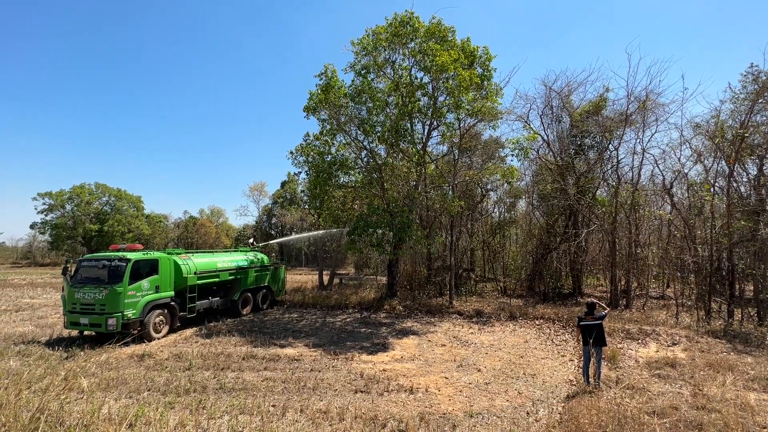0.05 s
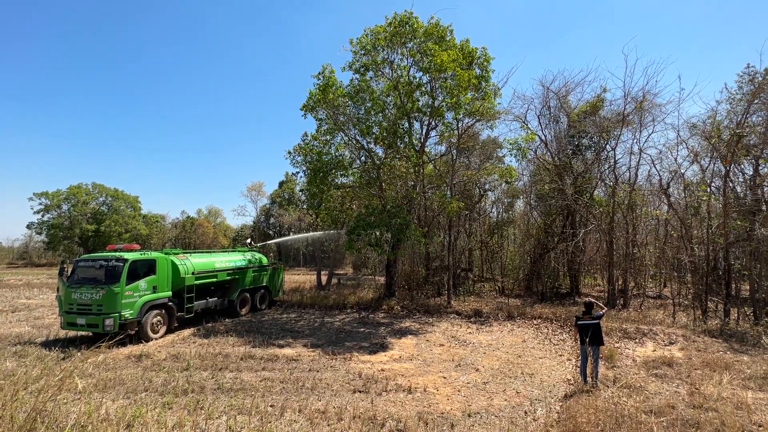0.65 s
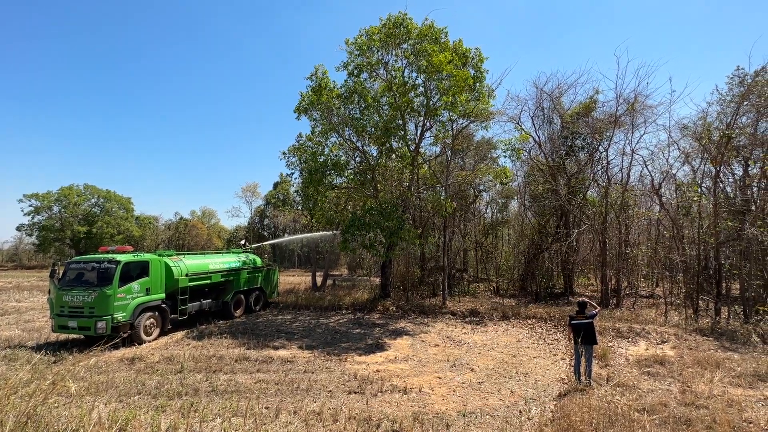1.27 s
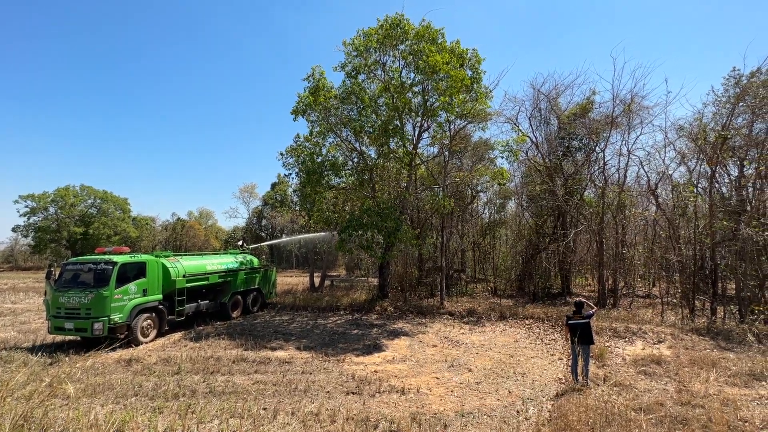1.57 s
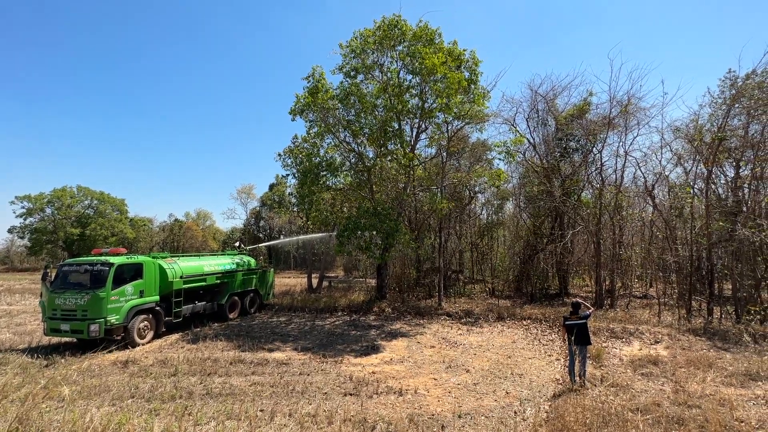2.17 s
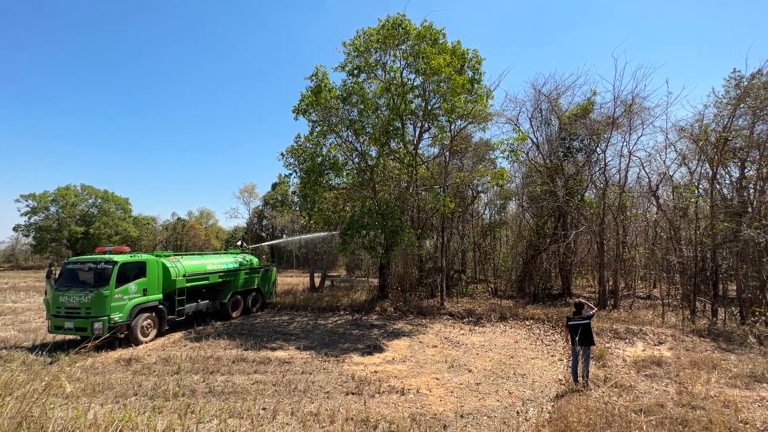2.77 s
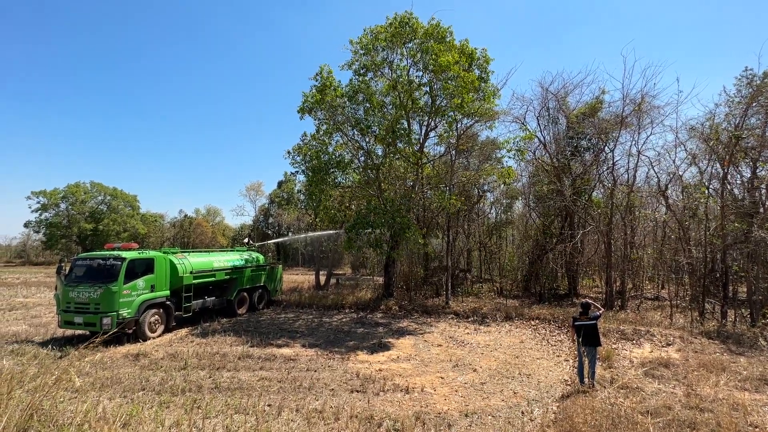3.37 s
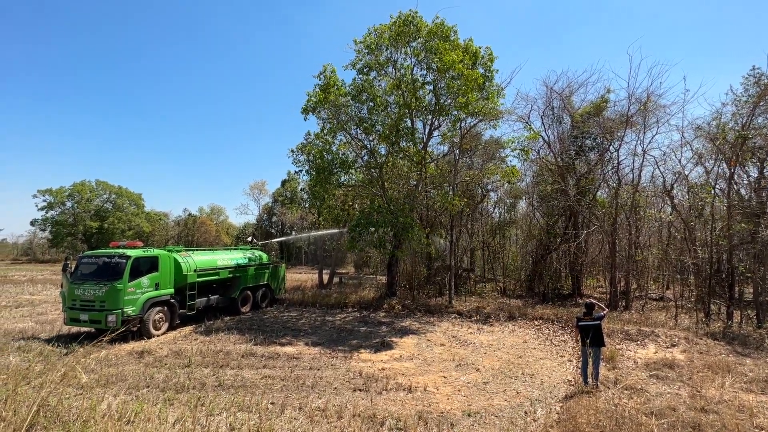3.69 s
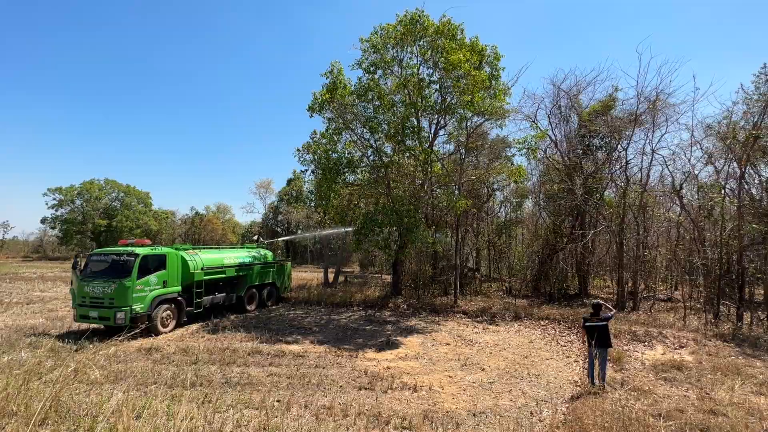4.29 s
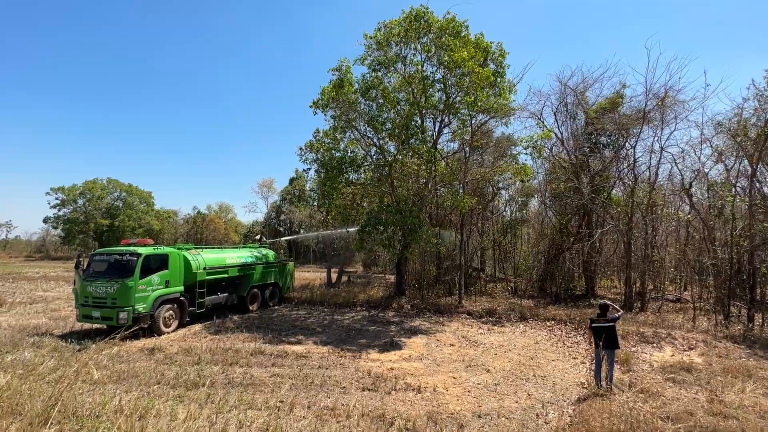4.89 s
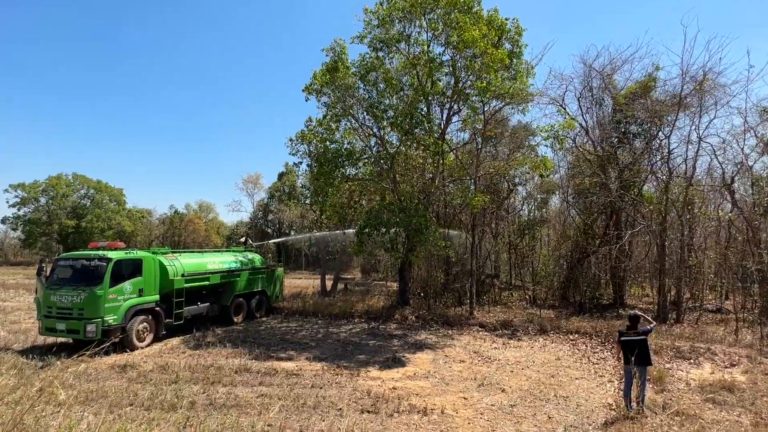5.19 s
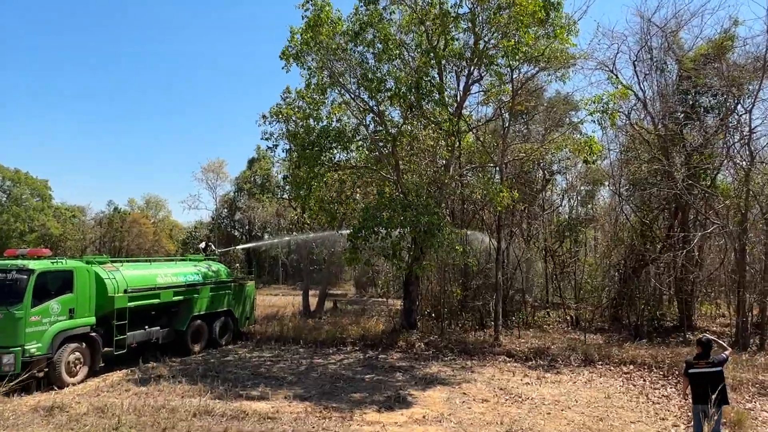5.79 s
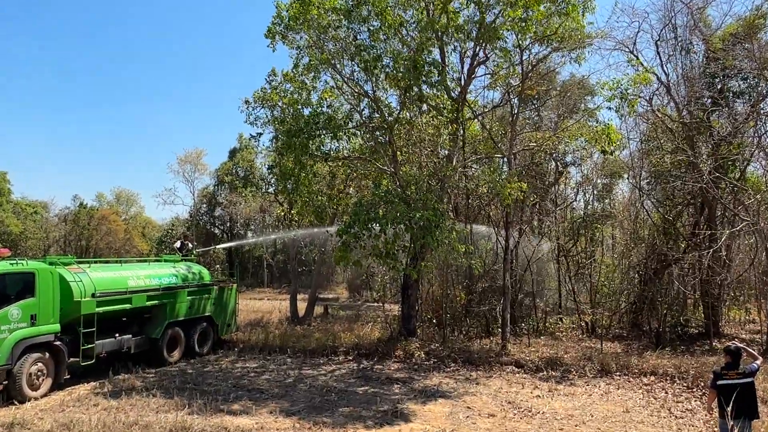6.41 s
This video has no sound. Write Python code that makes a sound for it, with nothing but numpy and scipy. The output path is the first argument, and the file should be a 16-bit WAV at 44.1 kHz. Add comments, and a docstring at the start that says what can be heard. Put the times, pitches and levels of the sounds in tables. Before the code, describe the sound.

A water tanker's diesel engine and whining pump run steadily as a jet hisses into trees, with rustling dry grass and wind buffeting.

```python
"""A water tanker stands in a dry field. From the start its six-cylinder diesel fires at fast idle,
driving a whining gear pump, and the turbulent jet hisses; close by, dry grass rustles and snaps.
After a second the wind rises and its eddies buffet the microphone; over the next two seconds more
and more of the bass narrows to mono. From about three seconds the jet splashes steadily into the
trees. Near the end the grass has quietened and a high ring comes through from the pump."""
import sys
import numpy as np
from scipy import signal
from scipy.fft import rfft, irfft
from scipy.io import wavfile
from scipy.ndimage import uniform_filter1d, map_coordinates

SR = 44100
rng = np.random.default_rng(int(sys.argv[2]) if len(sys.argv) > 2 else 0)


def persist_wave(psi):
    """Save psi, clipped to +-1, as 16-bit WAV."""
    counts = np.round(np.clip(psi, -1, 1) * 32767).astype(np.int16)
    wavfile.write(sys.argv[1], SR, np.atleast_2d(counts).T)


N = 284445
T = np.arange(N) / SR
HZ = np.fft.rfftfreq(N, 1 / SR)

# Engine speed. Each row: time in seconds, four-stroke cycles per second.
ENGINE_SPEED = [(0, 10.187), (4.7, 10.187), (5.3, 10.168), (6.1, 10.265)]
# How well the air carries the engine. Each row: time in seconds, gain in dB.
AIR_CARRY = [(0, -0.5), (2.5, -0.76), (4.6, 0.7), (5.75, 0), (6.2, 0.6)]
# Exhaust harmonics. Each row: multiple of the cycle (6 is the firing rate), early and late level in dB.
EXHAUST_ORDERS = [(4, -40, -35.5), (6, -35, -33), (8, -40, -37), (10, -43, -40), (12, -42, -36),
                  (16, -45, -42), (26, -53, -43.5), (27, -49, -43.5), (28, -52, -48), (52, -55, -45),
                  (56, -54, -52), (60, -56, -50), (65, -61, -53), (76, -62, -57)]
# The tones change colour as the listener shifts. Each row: time in seconds, share of the late levels.
LATE_SHARE = [(1.5, 0.07), (3.1, 1)]
# Spectrum of the engine's roar. Each row: frequency in Hz, density in dB.
ROAR_SPECTRUM = [(25, -78), (55, -49), (125, -53.5), (210, -56), (280, -59.5), (370, -61.5), (460, -67),
                 (560, -69.5), (720, -71), (930, -73.5), (1400, -74.5), (2300, -88.5), (3500, -102),
                 (7000, -103), (14000, -130)]
# Resonances of block and panels, and of the exhaust pipe. Each row: centre and width in Hz, peak in dB.
BLOCK_MODES = [(269, 25.5, -59.5), (1215, 290, -71.5), (1170, 160, -80.5), (1560, 93, -74),
               (1854, 100, -78.5)]
PIPE_MODES = [(553, 49, -66), (616, 270, -68.5), (693, 105, -72)]
# Course of the knock, pipe roar, pump whine and pump ring. Each row: time in seconds, gain in dB.
KNOCK_GAIN = [(0, -0.5), (3.8, 2.5), (4.3, 1), (5.7, -0.5), (6.1, -3.5)]
PIPE_GAIN = [(0, -0.5), (2.72, -1), (2.92, 1.5), (3.6, 1), (4.5, 2.5), (5.1, 1.5), (5.27, 5.5),
             (5.43, -0.5), (5.65, 0), (5.77, 4.5), (5.9, -8), (6.05, 1.5), (6.15, -19), (6.3, -6),
             (6.45, -2)]
WHINE_GAIN = [(0, -0.5), (.9, 4), (2.5, 1), (3.0, 2), (4.2, -2), (4.7, 4.5), (5.8, -0.5), (6.1, -8)]
RING_GAIN = [(5.5, -75), (6.0, -58.5)]
# Tones of the pump gears. Each row: multiple of the cycle, early and late level in dB.
GEAR_ORDERS = [(106, -61, -65), (112, -60, -60), (114, -53, -55), (116, -60, -57), (120, -56, -53),
               (128, -57.5, -57.5), (156, -62, -58), (162, -61, -61), (166, -61, -57.5), (178, -64, -62)]

# Spectra of the jet's hiss and of drops on leaves. Each row: frequency in Hz, density in dB.
JET_SPECTRUM = [(700, -101), (2300, -80.5), (3200, -84), (4100, -87.5), (4900, -88.5), (6000, -86.5),
                (7200, -94), (9000, -95.5), (10300, -95.5), (12000, -99), (13500, -101), (15500, -104)]
SPLASH_SPECTRUM = [(2500, -102), (4500, -98), (6000, -85.5), (7800, -88.5), (10300, -88), (12000, -92.5),
                   (13500, -93.5), (15500, -99)]
# Resonances of the nozzle and of the stream on the tree. Each row: centre and width in Hz, peak in dB.
NOZZLE_MODES = [(2850, 250, -88), (3560, 110, -86.5)]
STREAM_MODES = [(1935, 200, -71), (4320, 260, -78.5), (4880, 390, -79)]
# The jet swings into the trees. Each row: time in seconds, gains of jet, splash and stream in dB.
WATER_GAINS = [(0, 0, -19, -9), (.85, 1.8, -19, -18), (1.05, 1, -8, -20), (1.4, 1.7, -21, -26),
               (1.67, 1.5, -6.5, -22), (1.9, 1, -18, -26), (2.7, .5, -11, -13), (3.25, 1.5, -5, -16),
               (3.42, 0, -3.5, -11), (4.1, 0, -5, -4), (4.35, 1.5, -3, -4), (4.6, 0.5, -8, -4.5),
               (5.6, -0.5, -7.5, -3.5), (6.05, 0.5, -2.5, -4), (6.45, 0, 2.5, -2.5)]
# Engine, jet and splash at the two microphone ports.
# Each row: frequency in Hz, coherence from 0 to 1, phase lead of the left in radians.
ENGINE_STEREO = [(50.3, 0.7, 2), (288, 0.01, -1.3), (537, 0.95, -2.5), (870, 0.32, -4.5), (1110, 0.4, -4),
                 (1193, 0.16, -5), (1570, 1, -3), (1916, 0.2, -1.5), (2046, 1, 3), (3220, 0.6, 4),
                 (4830, 0, 7.5)]
JET_STEREO = [(2640, 0.45, 3.22), (4000, 0.24, 6.3), (5550, 0.37, 6.4), (6800, 0.5, 9.2), (7600, 0, 13),
              (9700, 0.5, 11.6)]
SPLASH_STEREO = [(2500, .5, 1.8), (4000, 0.76, 5.5), (6300, 0.65, 8.2), (7600, 0.58, 7.4), (8900, 0.83, 5),
                 (10250, 0.95, 4.5)]
# Stereo image of the top treble: left and right in opposite phase from about 10.5 to 12.3 kHz.
# Each row: frequency in Hz, coherence from 0 to 1, phase lead of the left in radians.
TREBLE_STEREO = [(10550, 1, 3.14), (12300, 1, 3.14), (13000, .6, 1.7), (13900, 1, 0)]
# Sideways lean of the jet. Each row: frequency in Hz, left minus right in dB.
JET_LEAN = [(2200, 0), (3300, 4.5), (5000, 4), (6400, 0), (7400, -3.5), (8800, -3.5), (10000, 0)]

# Spectrum of dry grass. Each row: frequency in Hz, relative density in dB.
GRASS_SPECTRUM = [(300, -0.5), (700, -25), (1000, 4.5), (1350, 1.5), (1750, 6), (2300, -1.5), (3000, -7),
                  (4200, -11.5), (7000, -19.5), (15000, -79)]
# Brushed grass and scuffed ground. Each row: start and length in seconds, level in dB.
GRASS_SWISHES = [(.09, 0.063, -47), (.78, 0.072, -41.5), (1.85, 0.42, -45.5), (2.37, 0.22, -41),
                 (2.79, 0.28, -36), (3.12, 0.79, -42), (3.6, 0.28, -38), (4.38, 0.41, -48)]
GROUND_SCUFFS = [(1.234, 0.0088, -37), (1.765, 0.04, -39), (2.302, 0.0067, -35), (4.748, 0.008, -36),
                 (5.343, 0.0088, -32), (5.706, .008, -39)]
# Breaking stalks. Each row: time in seconds, relative peak in dB, pitch in Hz.
STALK_SNAPS = [(0.137, -30, 1310), (0.8744, -26, 1350), (1.089, -26, 1150), (1.362, -27, 1200),
               (1.526, -31, 1250), (1.6121, -23.5, 1040), (1.882, -27, 1250), (1.956, -24.5, 1550),
               (1.9837, -23, 1140), (2.303, -24.5, 600), (2.3852, -24, 1570), (2.464, -26, 1760),
               (2.771, -21, 1500), (2.779, -22, 1530), (2.853, -33, 2000), (2.937, -18.5, 2800),
               (2.973, -20.5, 1510), (3.098, -23, 1840), (3.2443, -22.5, 1680), (3.352, -20.5, 1900),
               (3.428, -22.5, 1500), (3.463, -26, 1520), (3.555, -26, 1570), (3.7447, -25, 1440),
               (3.841, -27.5, 1600), (4.061, -22, 1000), (4.348, -20, 1170), (4.5171, -24.5, 1590),
               (4.601, -23.5, 1290), (4.618, -24, 1420), (4.647, -23, 1270), (4.723, -24, 1300),
               (4.788, -29, 1400), (4.817, -26, 1400), (4.954, -34, 1350)]

# Breeze on the microphone. Each row: time in seconds, level in dB.
BREEZE_LEVEL = [(0, -35), (.55, -37.5), (1.2, -25), (1.5, -29.5), (1.85, -23.5), (2.6, -24), (3.45, -28),
                (4.0, -29), (4.35, -21.5), (4.7, -36), (5.0, -28), (5.3, -26.5), (5.8, -19.5), (6.1, -21.5),
                (6.45, -33)]
# Single gusts. Each row: start and length in seconds, levels of large and small eddies in dB.
WIND_GUSTS = [(0.042, 0.065, -35, -26.5), (2.1, 0.2, -21.5, -30), (2.79, 0.18, -24, -23),
              (3.12, 0.031, -21, -28), (3.846, 0.053, -18, -24), (4.126, 0.058, -23, -30),
              (4.895, .24, -21.5, -27.5), (5.468, .2, -23.5, -23), (5.737, 0.19, -24.5, -19),
              (6.2, 0.035, -17.5, -31)]
# Spectrum of the buffeting. Each row: frequency in Hz, relative density in dB.
BUFFET_SPECTRUM = [(15, -30), (28, -4), (42, 6.5), (68, 7.5), (110, 1), (170, -12.5), (260, -14.5),
                   (400, -21), (900, -109)]
# Narrowing of the stereo image. Each row: time in seconds, frequency in Hz below which it is mono.
MONO_CROSSOVER = [(1.1, 22), (2.0, 124), (2.72, 385), (2.92, 750), (5.8, 677), (5.95, 496), (6.45, 277)]


def engine():
    """Phase locking: all follows one governed crankshaft; the wind carries the sound to and fro."""
    cycles = np.cumsum(curve(ENGINE_SPEED) * (1 + 0.0006 * drift(1.41))) / SR
    drone = gain_of(-0.5) * harmonics(cycles, EXHAUST_ORDERS, waver_db=3.5, waver_hz=3.3)
    return (drone + pump(cycles) + combustion(cycles)) * gain_of(curve(AIR_CARRY))


def combustion(cycles, cylinders=6, uneven_db=2, scatter_db=3.6, churn_db=1.1):
    """Impulse excitation: each firing drives noise into block and exhaust; no two cylinders are alike."""
    firings = cycles * cylinders
    stroke = firings.astype(int)
    cylinder_db = uneven_db * rng.standard_normal(cylinders)[stroke % cylinders]
    firing_db = scatter_db * np.minimum(rng.standard_normal(stroke[-1] + 1), 2)[stroke]
    pulses = unit_rms(gain_of(cylinder_db + firing_db) * np.exp(-(firings % 1) / 1.1))
    blows = unit_rms(2.4 + pulses)  # a steady floor smears the firings together
    puffs = unit_rms(np.sqrt(blows))
    knock = in_stereo(blows * clatter(cycles, repeat=0.25), resonances(BLOCK_MODES), ENGINE_STEREO)
    pipe = in_stereo(puffs * clatter(cycles, repeat=0.15), resonances(PIPE_MODES), ENGINE_STEREO)
    roar = in_stereo(puffs * clatter(cycles, repeat=0.15), response(ROAR_SPECTRUM), ENGINE_STEREO)
    knock *= gain_of(curve(KNOCK_GAIN) + churn_db * drift(23))
    pipe *= gain_of(curve(PIPE_GAIN))
    return knock + (pipe + roar) * gain_of(churn_db * drift(21))


def clatter(cycles, repeat, size=4096):
    """Periodicity: parts strike in the same order, so a share of the noise power repeats each cycle."""
    position = cycles % 1 * size
    periodic = np.array([map_coordinates(pattern, [position], order=3, mode="grid-wrap")
                         for pattern in rng.standard_normal((2, size))])
    return np.sqrt(repeat) * periodic + np.sqrt(1 - repeat) * rng.standard_normal((2, N))


def harmonics(cycles, orders, waver_db, waver_hz):
    """Harmonic series: sines at multiples of the engine cycle, each wavering in the moving air."""
    out = np.zeros((2, N))
    cycle_hz, late = cycles[-1] / T[-1], curve(LATE_SHARE)
    for multiple, early_db, late_db in orders:
        phase = 2 * np.pi * (multiple * cycles + rng.random()) + 0.3 * drift(4)
        lag = np.array([[0], [at_hz(ENGINE_STEREO, multiple * cycle_hz, column=2)]])
        tone = unit_rms(gain_of(waver_db * drift(waver_hz)) * np.sin(phase - lag))
        out += gain_of(early_db + (late_db - early_db) * late) * tone
    return out


def pump(cycles, right_db=0.5, waver_hz=2.5, ring_multiple=189):
    """Gear meshing: the teeth whine at high multiples of the cycle; one higher tone enters late."""
    whine = harmonics(cycles, GEAR_ORDERS, waver_db=3.5, waver_hz=waver_hz)
    whine *= gain_of(curve(WHINE_GAIN) + np.array([[-right_db], [right_db]]) / 2)
    ring = unit_rms(np.sin(2 * np.pi * ring_multiple * cycles + drift(waver_hz)))
    return whine + ring * gain_of(curve(RING_GAIN))


def water():
    """Turbulence and impact: the nozzle hisses, drops patter on leaves, the stream drums on a tree."""
    turbulence = rng.standard_normal((2, N))
    jet_colour = np.hypot(response(JET_SPECTRUM), resonances(NOZZLE_MODES))
    jet = in_stereo(turbulence, jet_colour, JET_STEREO + TREBLE_STEREO, at_hz(JET_LEAN, HZ))
    drops = clicks(per_s=22000, spread_db=-1.0)
    splash = in_stereo(drops, response(SPLASH_SPECTRUM), SPLASH_STEREO + TREBLE_STEREO)
    stream = in_stereo(clicks(per_s=8000, spread_db=2.5), resonances(STREAM_MODES), ENGINE_STEREO)
    return (jet * gain_of(curve(WATER_GAINS) + 0.5 * drift(25))
            + splash * gain_of(curve(WATER_GAINS, column=2) + drift(25))
            + stream * gain_of(curve(WATER_GAINS, column=3) + drift(23)))


def rustle(bands=5, clump_db=2.6, fade_db_per_s=1):
    """Stick-slip friction: dry stalks crackle in clumps, thick ones low and thin ones high."""
    log_centres = np.log(np.geomspace(700, 4500, bands))
    spectrum = 0
    for band in np.eye(bands):
        share = np.interp(np.log(HZ + 1), log_centres, band)
        crackle = unit_rms(clicks(per_s=900, spread_db=2.3) * gain_of(clump_db * drift(31)))
        spectrum = spectrum + rfft(crackle) * np.sqrt(share)
    grass = unit_rms(irfft(spectrum * response(GRASS_SPECTRUM), N))
    swish_power = swells(GRASS_SWISHES, rise_s=0.055, fall_s=0.11)
    stir_power = gain_of(-50 - fade_db_per_s * T) ** 2  # faint crackle between swishes
    return grass * np.sqrt(swish_power + stir_power) * gain_of(-0.5)


def snaps(decay_s=0.0017, octaves_below=1.4, octaves_above=0.7, dull_hz=5800, size=2048):
    """Brittle fracture: a stalk ticks around its own pitch; thick ones knock, thin ones crack."""
    t, hz = np.arange(size) / SR, np.fft.rfftfreq(size, 1 / SR)
    out = np.zeros((2, N))
    for time_s, peak_db, pitch_hz in STALK_SNAPS:
        detuning = np.log2((hz + 1) / pitch_hz) / np.where(hz < pitch_hz, octaves_below, octaves_above)
        colour = 1 / (1 + abs(detuning) ** 3) / (1 + (hz / dull_hz) ** 4)
        burst = (rng.standard_normal(size) + 0.5 * rng.standard_normal((2, size))) * np.exp(-t / decay_s)
        snap = irfft(rfft(np.roll(burst, size // 2, axis=1)) * colour)
        start = round(time_s * SR) - size // 2
        out[:, start:start + size] += gain_of(peak_db - 1.9) * snap / abs(snap).max()
    return out


def wind(eddy_db=2.0, eddy_hz=6.2, usual_db=-25, rise_s=0.005, fall_s=0.018):
    """Turbulent pressure: large eddies rumble on the microphone; gusts also shed small, faster ones."""
    breeze_db = curve(BREEZE_LEVEL) + eddy_db * drift(eddy_hz)
    fine_db = -41 + 2 * (breeze_db - usual_db)  # small eddies grow twice as fast in dB
    push = swells([(start, length, db) for start, length, db, _ in WIND_GUSTS], rise_s, fall_s)
    flutter = swells([(start, length, db) for start, length, _, db in WIND_GUSTS], rise_s, fall_s)
    large = steady_noise(response(BUFFET_SPECTRUM)) * np.sqrt(push + gain_of(breeze_db) ** 2)
    small = steady_noise(resonances([(120, 60, 0)])) * np.sqrt(flutter + gain_of(fine_db) ** 2)
    return (large + small) * gain_of(-4.5)


def scuffs(pitch_hz=540, width_hz=330):
    """Sliding friction: short, dull scrapes on the dry ground."""
    scrape = steady_noise(resonances([(pitch_hz, width_hz, 0)]))
    return scrape * np.sqrt(swells(GROUND_SCUFFS, rise_s=0.002, fall_s=0.006))


def in_stereo(drives, colour, stereo, balance_db=0):
    """Partial coherence: two independent drives are coloured and blended into left and right."""
    left, unrelated = rfft(drives) * colour * np.sqrt(SR / 2)
    hz, coherences, leads = np.transpose(stereo)
    unwrapped = np.transpose([hz, coherences, np.unwrap(leads)])
    coherence = np.clip(at_hz(unwrapped, HZ), 0, 1)
    lag = np.exp(-1j * at_hz(unwrapped, HZ, column=2))
    right = (coherence * left + np.sqrt(1 - coherence ** 2) * unrelated) * lag
    lean = gain_of(balance_db / 2)
    return irfft(np.array([left * lean, right / lean]), N)


def resonances(modes):
    """Resonance: the gain at every frequency is a sum of bell-shaped peaks."""
    return sum(gain_of(db) / (1 + 2 * ((HZ - hz) / width) ** 2) for hz, width, db in modes)


def clicks(per_s, spread_db):
    """Shot noise: two trains of independent clicks of random size."""
    size = gain_of(spread_db * np.minimum(rng.exponential(1, (2, N)), 4))
    return unit_rms(size * rng.standard_normal((2, N)) * (rng.random((2, N)) < per_s / SR))


def swells(events, rise_s, fall_s):
    """Incoherent addition: the powers of events that rise, hold and die away are summed."""
    power = np.zeros(N)
    for start, length, db in events:
        attack = np.clip((T - start) / rise_s, 0, 1)
        release = np.exp(-np.maximum(T - start - length, 0) / fall_s)
        power += (gain_of(db) * attack * release) ** 2
    return power


def steady_noise(colour):
    """Filtered noise, divided by its running rms to hold the level steady."""
    noise = irfft(rfft(rng.standard_normal(N)) * colour, N)
    return noise / np.sqrt(uniform_filter1d(noise ** 2, size=4000))


def drift(rate_hz, step=100):
    """Random modulation: noise of rms 1, low-passed at rate_hz."""
    count = N // step + 2
    hz = np.fft.rfftfreq(count, step / SR)
    slow = irfft(rfft(rng.standard_normal(count)) * (hz > 0) / (1 + (hz / rate_hz) ** 4))
    return unit_rms(np.interp(np.arange(N) / step, np.arange(len(slow)), slow))


def response(spectrum):
    """Frequency response: a table in dB as a gain at every frequency."""
    return gain_of(at_hz(spectrum, HZ))


def at_hz(table, hz, column=1):
    """Interpolation of one column along log frequency."""
    table = np.array(table, float)
    return np.interp(np.log(hz + 1), np.log(table[:, 0] + 1), table[:, column])


def curve(table, column=1):
    """Interpolation of one column along time."""
    table = np.array(table, float)
    return np.interp(T, table[:, 0], table[:, column])


def gain_of(db):
    """The decibel law: 20 dB is a factor of ten in amplitude."""
    return 10 ** (np.asarray(db) / 20)


def unit_rms(x):
    """Normalisation to rms 1."""
    return x / np.sqrt(np.mean(x ** 2) + 1e-20)


def scene():
    """Superposition: the pressures of truck, water, grass, ground and wind add."""
    return engine() + water() + rustle() + snaps() + scuffs() + wind()


def record(dry, bass_db=-0.52, edge_hz=15650):
    """Crossover and band limit: the left bass feeds both channels; a low-pass cuts the top treble."""
    hz, t, spectra = signal.stft(dry, SR, nperseg=1024, noverlap=768)
    crossover_hz = np.interp(t, *np.transpose(MONO_CROSSOVER))
    mono = 1 / (1 + (hz[:, None] / crossover_hz) ** 20)
    spectra[1] = np.sqrt(mono) * spectra[0] + np.sqrt(1 - mono) * spectra[1]
    _, narrowed = signal.istft(spectra * gain_of(bass_db * mono), SR, nperseg=1024, noverlap=768)
    low_pass = signal.firwin(511, edge_hz, window=("kaiser", 9), fs=SR)
    return signal.oaconvolve(narrowed[:, :N], low_pass[None], "same")


dry = scene()
out = record(dry)
persist_wave(out)
```